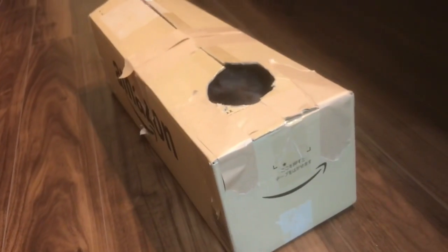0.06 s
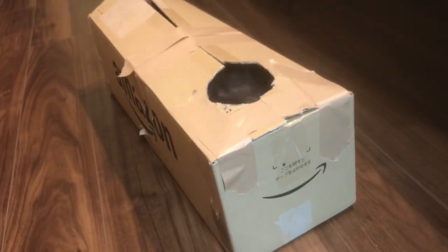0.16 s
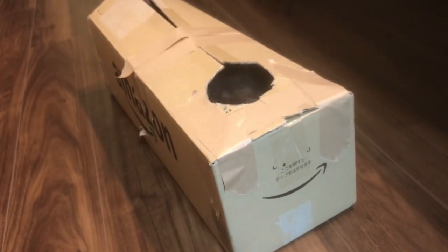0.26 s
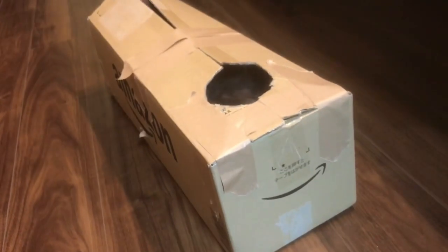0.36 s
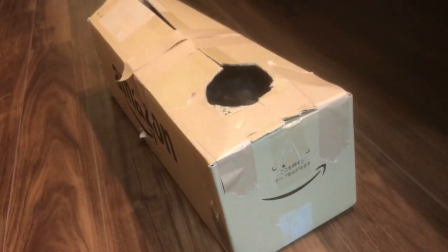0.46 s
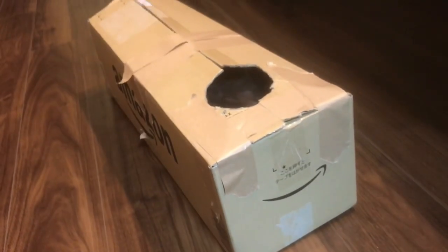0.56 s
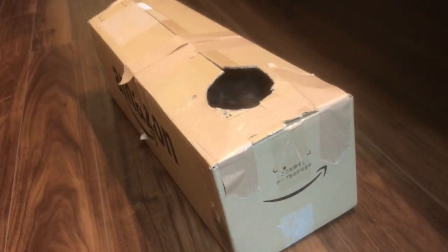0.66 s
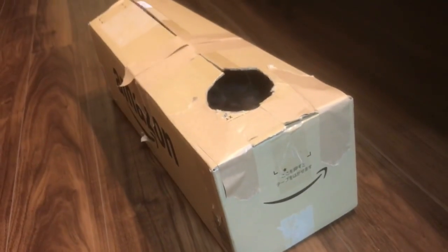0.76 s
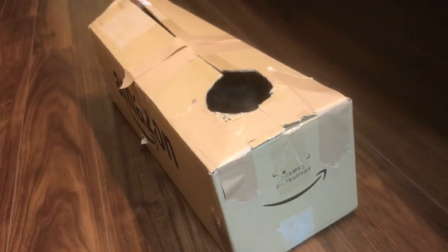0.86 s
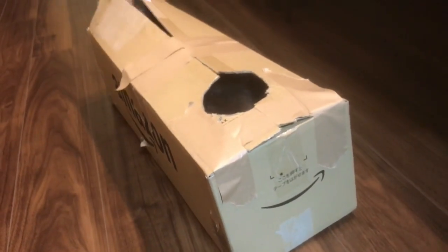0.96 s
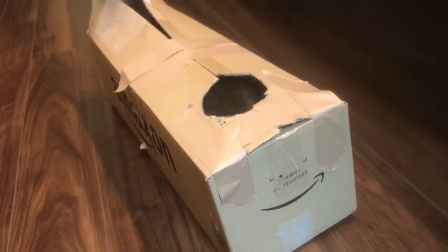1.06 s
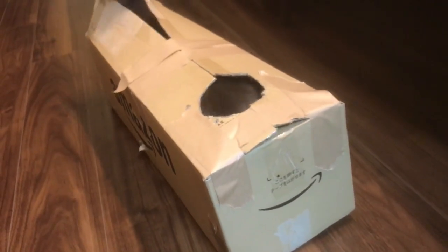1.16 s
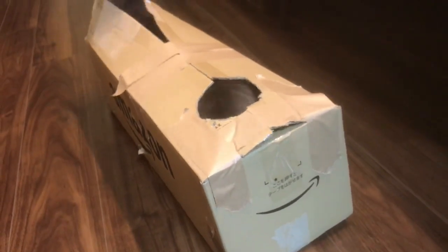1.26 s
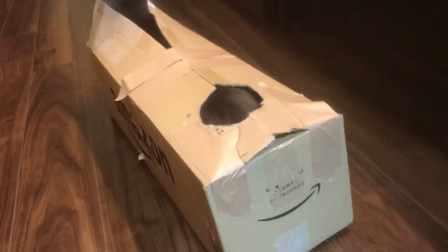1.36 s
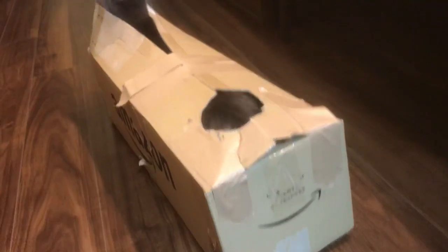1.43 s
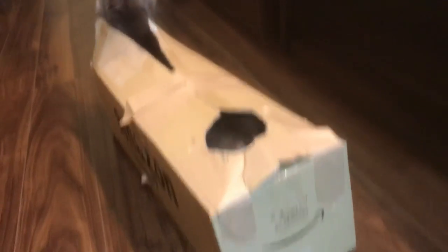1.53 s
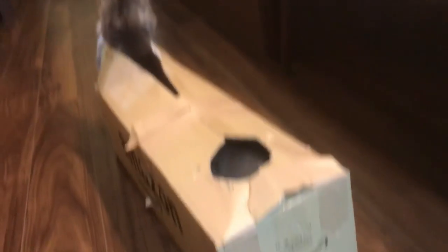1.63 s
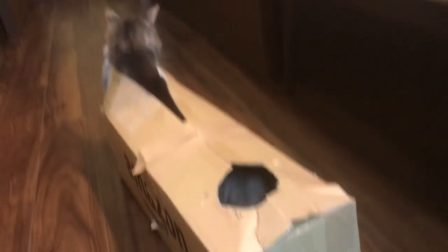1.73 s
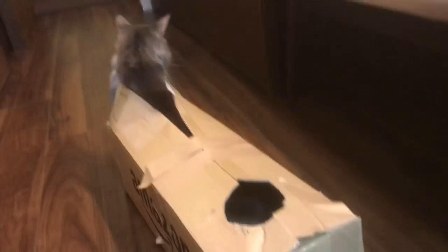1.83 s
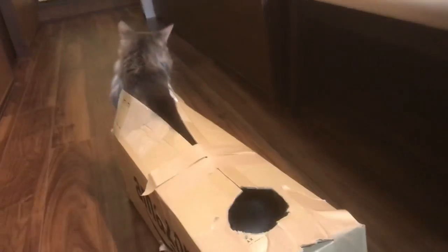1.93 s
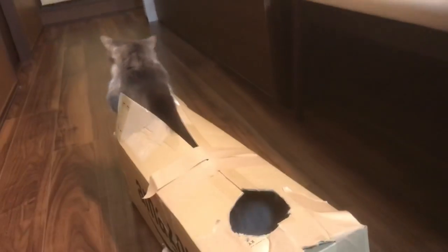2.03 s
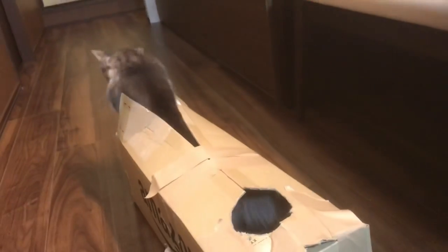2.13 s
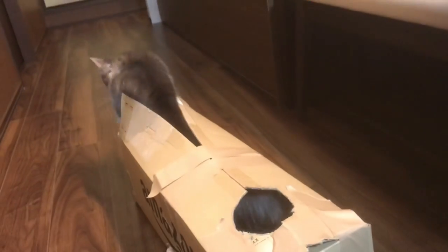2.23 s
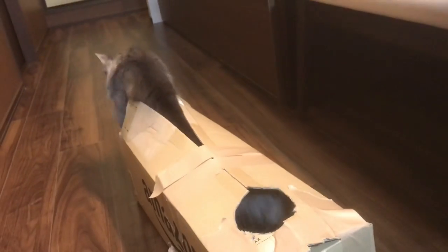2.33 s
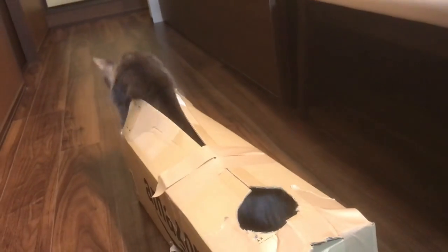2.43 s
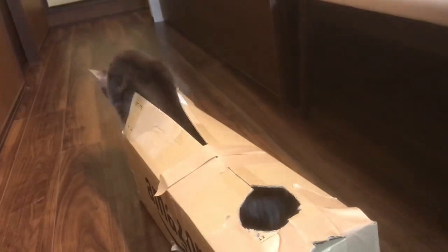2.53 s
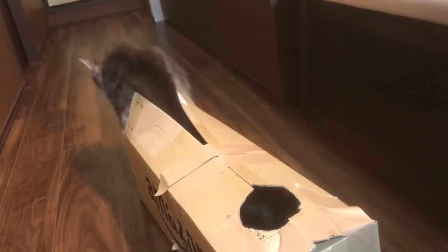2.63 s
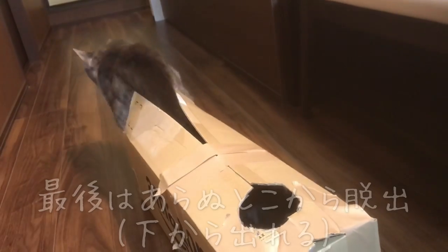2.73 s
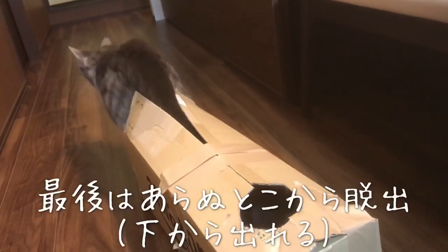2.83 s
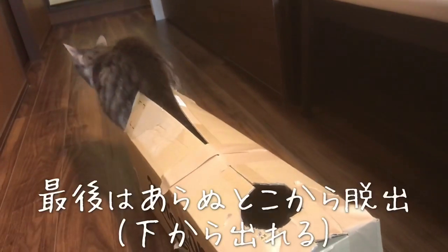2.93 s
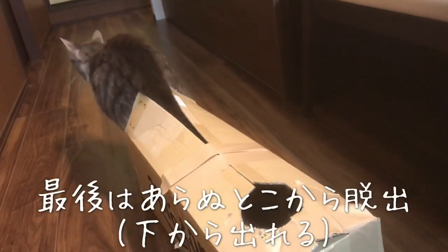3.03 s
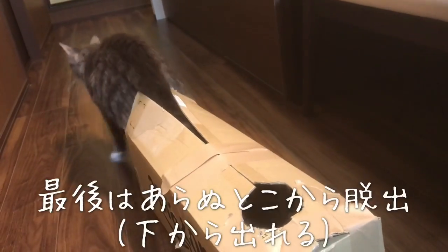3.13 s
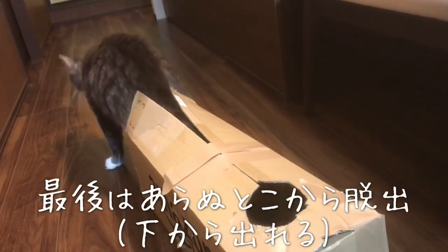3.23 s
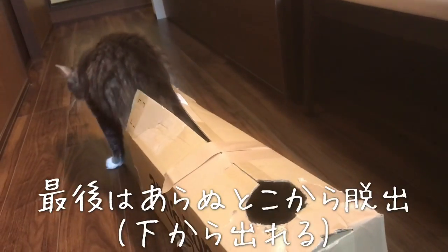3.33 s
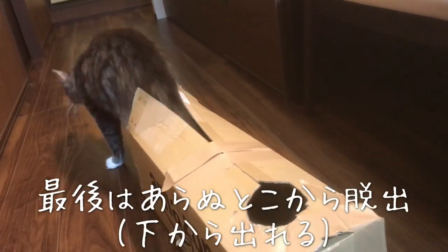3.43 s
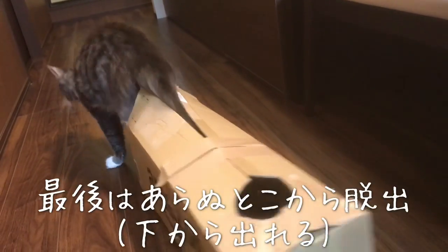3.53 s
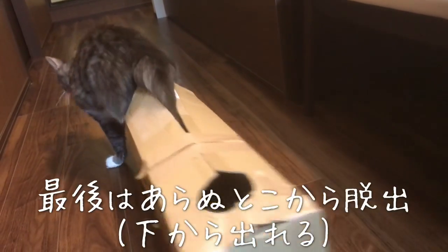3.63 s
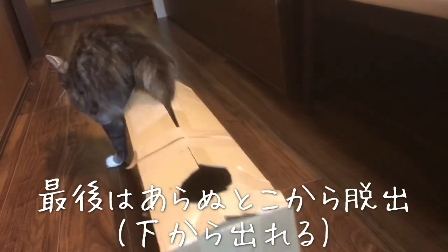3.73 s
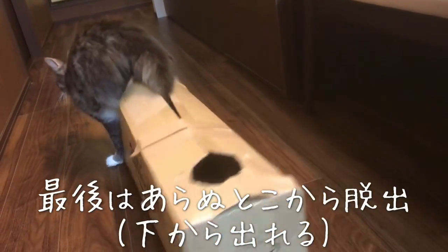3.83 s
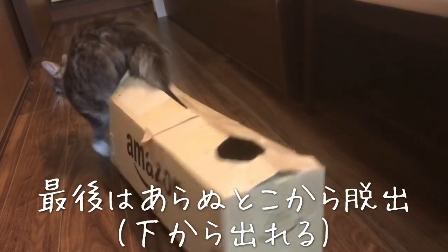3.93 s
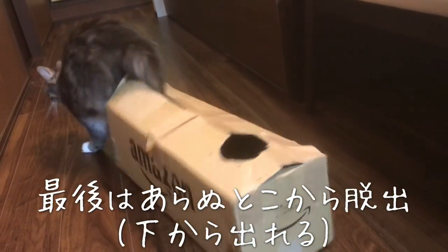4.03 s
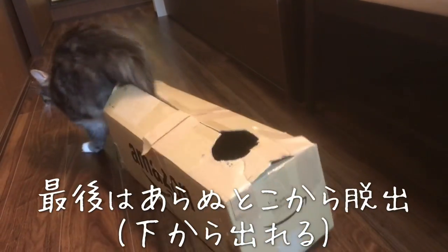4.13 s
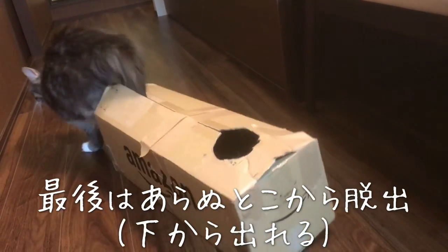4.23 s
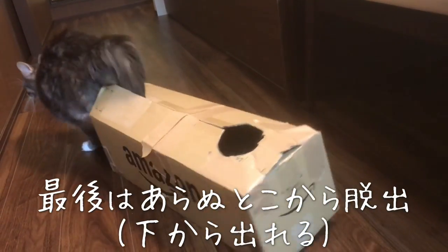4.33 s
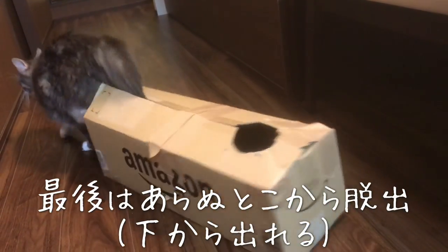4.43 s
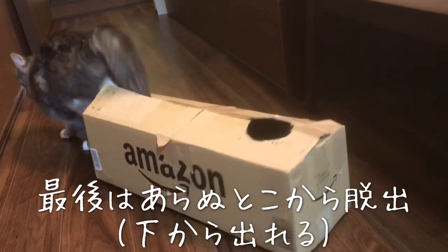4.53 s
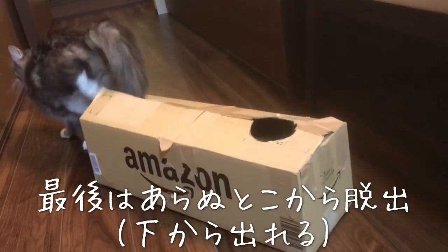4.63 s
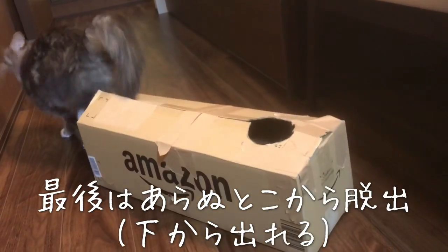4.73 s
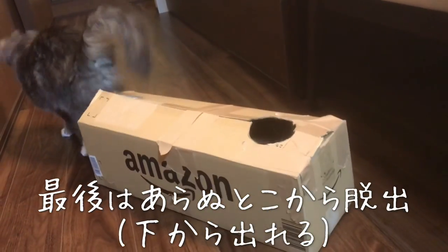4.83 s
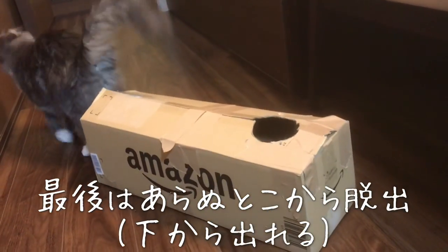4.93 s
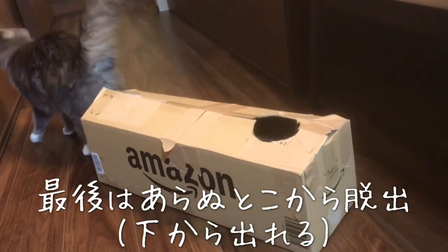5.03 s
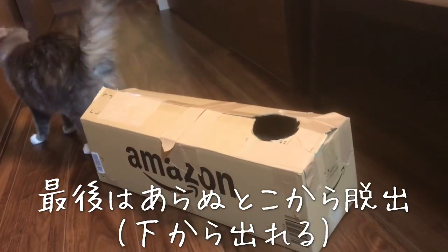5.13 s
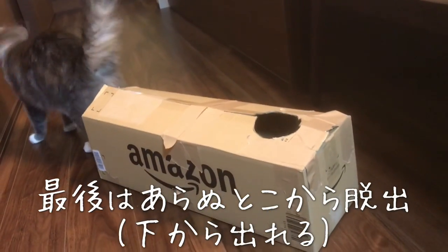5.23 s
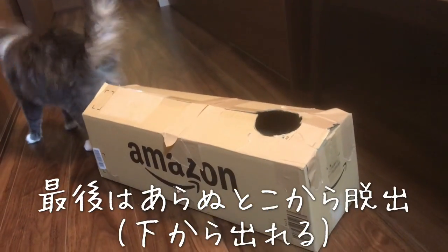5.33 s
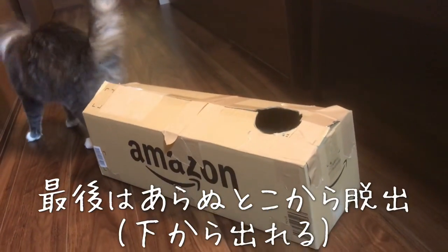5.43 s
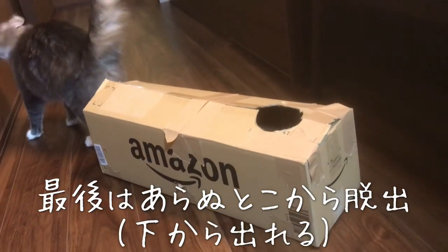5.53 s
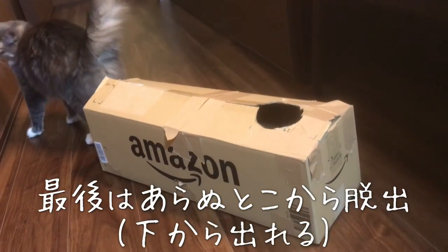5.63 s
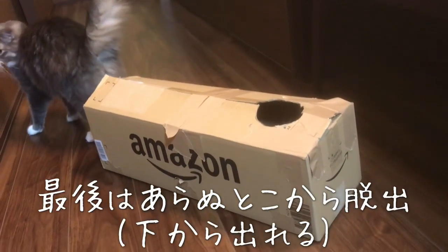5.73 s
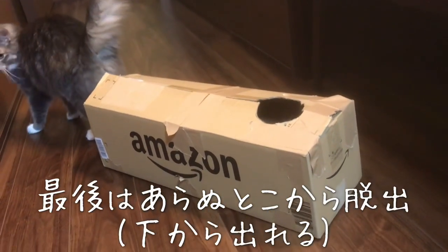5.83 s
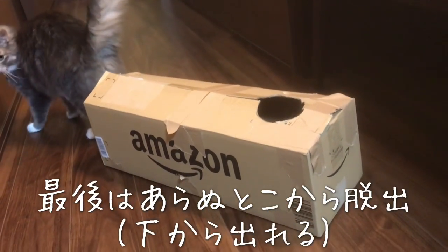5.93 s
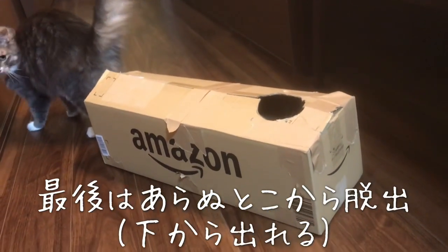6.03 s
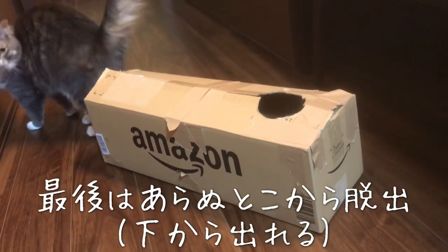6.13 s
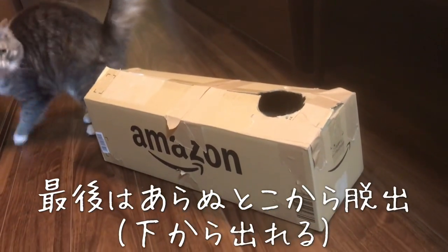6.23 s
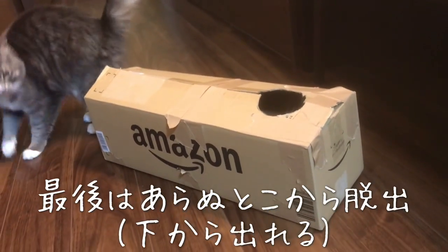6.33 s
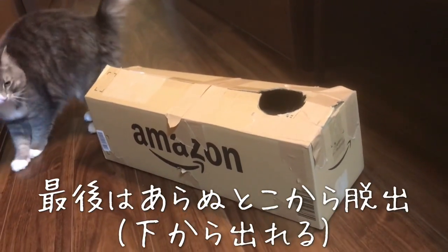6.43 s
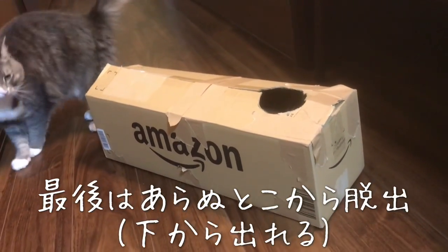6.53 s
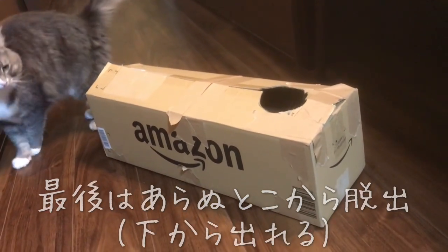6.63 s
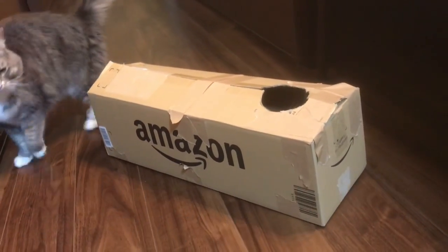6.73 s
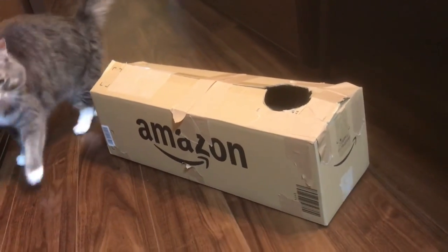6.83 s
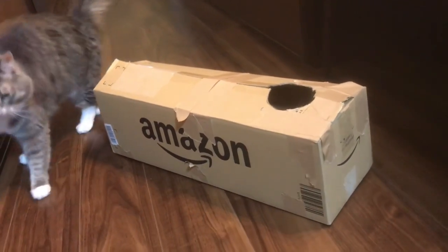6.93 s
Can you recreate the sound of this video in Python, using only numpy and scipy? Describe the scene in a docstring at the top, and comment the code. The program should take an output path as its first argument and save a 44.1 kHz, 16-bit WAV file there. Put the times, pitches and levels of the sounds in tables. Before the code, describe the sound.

A cat squeezes out of a cardboard box, scraping and rustling, with hollow thumps, claw ticks and one heavy thud on a wooden floor.

```python
"""A cat squeezes out of a long cardboard box on a wooden floor in a quiet home.
Over faint room noise, friction slips on fur and walls drive the box modes from the start;
weight thumps the floor panels as damped modes, and claws and creases tick as noise snaps through resonances.
Near 4 s an edge squeaks by stick-slip, then the heaviest thump lands; blows and rubbing thin out,
and from 6 s paw pads brush the boards as soft puffs of filtered noise."""
import sys
import numpy as np
from scipy import signal
from scipy.fft import rfft, irfft, next_fast_len
from scipy.io import wavfile

SR = 44100
rng = np.random.default_rng(int(sys.argv[2]) if len(sys.argv) > 2 else 0)


def materialize(psi):
    """Save the field psi as 16-bit PCM at rate SR to the path in sys.argv[1].

    A 1-D psi becomes a single channel; in a 2-D psi each row is a channel.
    """
    bounded = np.clip(np.atleast_2d(psi).T, -1, 1)
    quanta = np.round(bounded * 32767).astype(np.int16)
    wavfile.write(sys.argv[1], SR, quanta)


N = 307818

# steady room air, relative spectrum: freq_hz, density_db (per Hz)
AIR_SPECTRUM = [(15, -61), (25, -38), (41, -3.5), (64, -1.5), (120, -10.5), (170, -6), (276, -19),
                (425, -22), (486, -23.5), (587, -22.5), (1980, -35), (4950, -42), (13100, -34),
                (15800, -36)]
AIR_DB = -63.5
# noise bands in the room: centre_hz, width_hz (of each of two passes), level_db (rms)
HUM_BANDS = [(61.1, 4.9, -74.5), (81, 1.6, -68.5), (157, 2.6, -80.5), (341.3, 13, -84), (13100, 650, -80)]
# modes of the box: freq_hz, level_db (relative), t60_s
BOX_MODES = [(52, 2.5, 1), (80.9, 4.5, 0.92), (109.7, 1.5, 0.26), (128.4, 2.5, 0.27), (150.7, -2.5, 0.53),
             (189.4, 0.5, 0.079), (257.4, -1, 0.2), (308.4, 2, 0.42), (420, -17, 0.41), (508, -9.5, 0.15),
             (631.7, -2.5, 0.22), (733, -13.5, 0.016), (835, -12.5, 0.058), (912, -10.5, 0.044),
             (1032, -21, 0.053), (1330, 0.5, 0.016), (1458, -2, 0.034), (1560, -2.5, 0.038),
             (1703, -16, 0.062), (2300, -33, 0.04), (2780, -42, 0.075), (3250, -33, 0.048),
             (3780, -16, 0.052)]
LOW_MODES, WALL_MODES = BOX_MODES[:9], BOX_MODES[9:]      # they part at about 450 Hz
# relative spectra of scrape, fur and its finer sheen: freq_hz, density_db (per Hz)
SCRAPE_SPECTRUM = [(210, -18.5), (350, -8), (419, -6.5), (852, 3), (1200, -1.5), (1370, -8.5), (1850, -6),
                   (3000, -5.5), (3900, -49), (6600, -120)]
FUR_SPECTRUM = [(1500, -2), (2500, -4), (3500, -2), (4700, -3.5), (5300, -5), (7000, -8), (9000, -21.5)]
SHEEN_SPECTRUM = [(5000, -53), (7000, -9.5), (9000, -0.5), (12000, 0), (14000, -1), (16000, -1.5)]
# the body leaning along the walls: time_s, scrape_db, fur_over_scrape_db, sheen_over_fur_db
LEANING = [(0.0, -58, -0.5, -0.5), (.13, -58.5, -4, 7.5), (.33, -58, -4.5, -2.5), (.53, -71.5, 3.5, -3.5),
           (.86, -69, -0.5, 0), (.95, -60, -1.5, 0), (1.4, -54.5, -4, -1), (1.84, -51.5, -6, -1),
           (1.915, -72, -3, -1), (1.95, -59, -0.5, -3), (2.43, -63, -4, 0), (2.56, -52, -1.5, -1.5),
           (2.66, -54, -1, 0.5), (2.87, -56.5, -2, -0.5), (3.26, -58, -5.5, -1), (3.57, -51.5, -3, -1.5),
           (3.67, -52, 4.5, 2), (3.75, -52.5, 4.5, 6), (3.97, -51.5, 5.5, -1.5), (4.2, -53, 7.5, 1),
           (4.26, -49, -12, 0.5), (4.42, -55.5, -8, -5), (4.7, -58.5, -11, -3), (4.82, -55, -7.5, 0.5),
           (4.92, -79, 4.5, -4), (5.2, -69, -1.5, -6), (5.62, -68.5, -4, -4), (5.7, -80, 4, -13.5),
           (6.98, -82.5, 5.5, -2.5)]
# single strokes of paw or flank on the board:
# peak_s, length_s, scrape_db, fur_over_scrape_db, rocking_over_scrape_db
BOARD_STROKES = [(0.235, 0.11, -46.5, -7.5, 10), (0.588, 0.08, -47, -10, 5.5),
                 (0.642, 0.19, -47.5, -0.5, -0.5), (1.078, 0.21, -54.5, -0.5, 9),
                 (1.16, 0.36, -50, -6.5, -8), (1.248, 0.22, -47.5, -4, 7), (1.447, 0.45, -62, 5, -8),
                 (1.713, 0.092, -43, -9, -12), (1.952, 0.048, -51, 3.5, 2), (2.062, 0.09, -60, 8.5, 5.5),
                 (2.152, 0.24, -52.5, 0.5, -5), (2.238, 0.11, -52, -0.5, -4), (2.352, 0.11, -53, -4, 5),
                 (3.038, 0.16, -57.5, -1, 3), (3.208, 0.11, -59.5, -21, 8), (3.3, 0.1, -55.5, 0.5, -14),
                 (3.467, 0.2, -52, -7, -19), (3.624, 0.097, -50, -6, -1.5), (3.716, 0.071, -50, 5.5, -6),
                 (3.783, 0.14, -56, 10, 1), (4.08, 0.085, -62, 10, -1), (4.14, 0.11, -44.5, -20, 4),
                 (4.226, .1, -38.5, -23, 5.5), (4.323, 0.19, -48, -1.5, -17), (4.476, 0.23, -49.5, -4, -26),
                 (4.532, 0.17, -55.5, 9.5, -14), (4.592, 0.19, -60, 6, 10), (4.642, 0.14, -48, -2.5, 4.5),
                 (4.682, 0.1, -61, -15, 13), (4.738, 0.13, -49.5, -3.5, -6), (5.022, 0.073, -65, -3, 2),
                 (5.207, 0.16, -69, 3, 9.5), (5.285, 0.15, -60.5, -22, 4), (5.371, 0.043, -70, 8, 17.5),
                 (5.406, .06, -60.5, -19, 9), (5.474, 0.092, -73.5, 14, 21.5), (5.517, 0.24, -62.5, -10, 8),
                 (5.79, 0.22, -80, 9.5, 6)]
STROKE_RISE, STROKE_EDGE_DB, STROKE_ROUND = 0.34, -17, 1.3     # share before the peak; level at ends; roundness
LEAN_ROCK_DB, REST_ROCK_DB = -6.5, -70.5      # rocking over the leaning scrape; rocking at rest
RATTLE_DB, RATTLE_T60_S = -24, 0.52         # the box rocks on after each thump
# weight landing on the floor: start_s, peak_db, panel_hz (pitch of the loaded panel), panel_t60_s, hardness_db
WEIGHT_THUMPS = [(.167, -43, 271, .13, -11), (0.217, -25, 328.4, 0.15, -5.5), (.235, -26, 130, 0.1, -20),
                 (.545, -48, 318, .15, -22), (0.668, -41, 130, 0.11, -25), (.839, -34.5, 140.5, 0.21, -32),
                 (1.022, -39.5, 155, 0.057, -20), (1.077, -47, 84.4, 0.16, -14),
                 (1.107, -37.5, 303, 0.13, -11), (1.161, -39.5, 80.7, 0.19, -18),
                 (1.194, -41.5, 293, .1, -13), (1.222, -33.5, 118, 0.075, -22),
                 (1.261, -30.5, 127, 0.08, -2), (1.705, -36.5, 328, 0.086, -4), (1.72, -34, 81, 0.16, -25),
                 (1.944, -32, 116, 0.19, -29), (1.999, -40.5, 91.5, 0.34, -25),
                 (2.24, -40.5, 101, .19, -15), (2.365, -35, 147.4, 0.24, -10), (2.516, -36.5, 348, .1, -9),
                 (3.248, -43, 109, 0.068, -21.5), (3.329, -46, 89, 0.31, -6), (3.506, -43, 138, 0.25, -17),
                 (3.625, -29, 108, 0.15, -30), (3.785, -23.5, 233, .07, -22), (3.79, -29, 118, .2, -24.5),
                 (3.985, -32, 323, 0.054, -3), (4.11, -26, 136.5, 0.3, -29), (4.146, -26, 161, .094, -7),
                 (4.19, -28, 178, 0.37, -10), (4.208, -19, 142, .082, 1), (4.22, -11.5, 127, 0.1, -4.5),
                 (4.288, -31, 125, 0.4, -23), (4.328, -36.5, 111, 0.13, -15), (4.566, -40, 100, 0.2, -21),
                 (4.842, -44, 88.8, 0.14, -19), (5.016, -36, 61, 0.54, -29), (5.129, -42.5, 57, .13, -39),
                 (5.208, -42.5, 93.5, 0.2, -21), (5.313, -39.5, 122, 0.12, -7),
                 (5.417, -39.5, 95, 0.17, -11), (5.52, -42, 131, .088, -13), (5.581, -42, 143, 0.14, -11),
                 (5.627, -37.5, 91, 0.075, -11)]
LANDING_CYCLES = 0.45     # time constant of a landing, in swings of the panel
# claws and creases: start_s, peak_db, centre_hz, t60_s, crack_db (share of bright crack)
CLAW_TICKS = [(0.17, -34.5, 1450, 0.12, -22), (0.2154, -26.5, 912, 0.057, -11),
              (0.399, -24, 4680, 0.04, -15), (.574, -36.5, 1510, 0.15, -20), (.625, -31, 1420, 0.2, -28),
              (1.4164, -34.5, 3540, .02, 10), (1.509, -23, 3250, 0.031, 14.5), (1.527, -32, 1200, 0.031, 6),
              (1.6267, -31, 1530, 0.042, -16), (1.815, -33.5, 3700, 0.079, -18),
              (1.936, -26.5, 1530, 0.02, 4), (1.948, -29, 770, 0.026, -26), (2.061, -36, 3930, 0.055, -10),
              (2.598, -37, 912, 0.05, -20), (2.651, -36.5, 880, 0.05, -24), (3.284, -36, 866, 0.12, -15),
              (3.501, -35.5, 1500, 0.059, -17), (3.632, -29, 3260, 0.056, -24),
              (4.206, -20, 912, 0.074, -3), (4.224, -14.5, 1400, 0.089, -28), (4.48, -38, 1500, .08, -26),
              (5.221, -47, 1670, 0.038, -16), (5.274, -45, 1610, .04, -17), (5.323, -51, 1680, .035, -18),
              (5.372, -50, 710, .035, -18), (5.401, -44.5, 1470, .038, -20), (5.479, -43, 1710, 0.056, -11),
              (5.506, -41, 1450, 0.079, -24), (5.61, -44, 1280, .038, -24),
              (6.6252, -45.5, 596, 0.061, -24)]
# a box edge drags on the boards: time_s, level_db, pitch_hz
EDGE_SQUEAK = [(3.959, -60, 2057), (3.989, -55, 2210), (4.04, -47, 2643), (4.07, -54, 2600),
               (4.1, -58, 2250), (4.129, -55, 2080), (4.18, -47, 2160), (4.2, -64, 2200)]
# paw pads brush the boards: start_s, peak_db, centre_hz, length_s
PAW_BRUSHES = [(6.03, -61.5, 4400, 0.04), (6.294, -58.5, 4600, 0.029), (6.449, -48.5, 6500, 0.026),
               (6.565, -61.5, 6470, 0.027), (6.849, -59.5, 5130, 0.041), (6.927, -54.5, 5960, 0.034)]
ROOM_T60_S, ROOM_DB = 0.46, -15.5
# colour of the microphone port: centre_hz, width_hz, gain_db
MIC_PORT = [(4940, 190, -6.5), (7550, 600, -3.5), (10550, 580, -5)]
MIC_LOW_HZ, CUTOFF_HZ = 50.7, 15720


def from_db(db):
    """Level law: decibels to amplitude gain."""
    return 10 ** (np.asarray(db) / 20)


def rms_one(x):
    """Normalisation: scales a signal to rms 1."""
    return x / np.sqrt(np.mean(x ** 2) + 1e-20)


def add(out, start_s, sound):
    """Superposition: mixes a sound in at its start time."""
    at = round(start_s * SR)
    out[at:at + len(sound)] += sound[:N - at]


def colour(x, spectrum):
    """Linear filtering: spectrum points joined over log frequency weight the signal; rms 1."""
    size = next_fast_len(N)
    hz, db = np.transpose(spectrum)
    log_bins = np.log(np.fft.rfftfreq(size, 1 / SR) + 1)
    gain = from_db(np.interp(log_bins, np.log(hz), db, -90, -90))
    return rms_one(irfft(rfft(x, size) * gain, size)[:N])


def resonance(x, hz, width_hz):
    """Damped resonance: a two-pole band-pass with gain 1 on top."""
    r = np.exp(-np.pi * width_hz / SR)
    poles = [1, -2 * r * np.cos(2 * np.pi * hz / SR), r * r]
    return signal.lfilter([(1 - r * r) / 2, 0, (r * r - 1) / 2], poles, x)


def flutter(rate_hz, depth_db):
    """Random modulation: low-passed noise moves the gain by depth_db rms."""
    r = np.exp(-2 * np.pi * rate_hz / SR)
    slow = signal.lfilter([1], [1, -2 * r, r * r], rng.standard_normal(N + SR))[SR:]   # settled after 1 s
    return from_db(depth_db * rms_one(slow))


def grains(per_s, spread_db):
    """Dry friction: random slips of uneven size and sign."""
    sizes = from_db(spread_db * np.minimum(rng.exponential(1, N), 4))
    signs = rng.choice([-1, 1], N)
    return sizes * signs * (rng.random(N) < per_s / SR)


def background():
    """Steady noise: broad room air, with narrow resonances as wavering hums and a thin high hiss."""
    noise = rng.standard_normal(N)
    hums = np.zeros(N)
    for hz, width_hz, db in HUM_BANDS:
        band = resonance(resonance(noise, hz, width_hz), hz, width_hz)
        hums += from_db(db) * rms_one(band)
    return from_db(AIR_DB) * colour(rng.standard_normal(N), AIR_SPECTRUM) + hums


def efforts():
    """Power addition: leaning, strokes and rattle after thumps give the gains of rocking, scrape, fur and sheen."""
    t = np.arange(N) / SR
    time_s, *columns = np.transpose(LEANING)
    lean_db, furry_db, fine_db = [np.interp(t, time_s, c) for c in columns]
    power = from_db(np.array([lean_db + LEAN_ROCK_DB, lean_db, lean_db + furry_db])) ** 2
    power[0] += from_db(REST_ROCK_DB) ** 2
    for peak, length, db, fur_db, rock_db in BOARD_STROKES:
        near = slice(max(int((peak - 2 * length) * SR), 0), int((peak + 2 * length) * SR))
        before = (peak - t[near]) / STROKE_RISE
        after = (t[near] - peak) / (1 - STROKE_RISE)
        away = np.maximum(before, after) / length      # 0 at the peak, 1 at both ends
        levels_db = db + np.array([[rock_db], [0], [fur_db]])
        power[:, near] += from_db(levels_db + STROKE_EDGE_DB * away ** STROKE_ROUND) ** 2
    for start_s, db, *rest in WEIGHT_THUMPS:
        rattle_db = db + RATTLE_DB - 60 * t[:SR // 2] / RATTLE_T60_S
        add(power[0], start_s, from_db(rattle_db) ** 2)
    rock, scrape, fur = np.sqrt(power)
    return rock, scrape, fur, fur * from_db(fine_db)


def patches(x, low_hz, high_hz, count, width, depth_db):
    """Moving contact: narrow resonances across a range come and go independently."""
    centres = np.geomspace(low_hz, high_hz, count)
    return rms_one(sum(flutter(13.0, depth_db) * resonance(x, hz, width * hz) for hz in centres))


def rubbing():
    """Friction excitation: slips drive the box modes; fur adds a hiss and a finer sheen."""
    rocking, scraping, furring, sheening = efforts()
    shoves = grains(400., 0.54) * flutter(8.9, 2.6)
    slips = grains(3000., 1.4) * flutter(32.0, 1.03)
    hairs = grains(10000., 2.1) * flutter(19.0, 0.72)
    low, walls = np.zeros(N), np.zeros(N)
    decay = np.log(1000) / np.pi      # bandwidth in Hz times t60 in s
    for hz, db, t60 in LOW_MODES:
        low += from_db(db) * resonance(shoves, hz, 2.06 * decay / t60)      # damped by the load
    for hz, db, t60 in WALL_MODES:
        # each wall mode is fed more or less as the contact moves along the board
        walls += from_db(db) * resonance(slips * flutter(8.3, 4.3), hz, decay / t60)
    scrape = rms_one(colour(slips, SCRAPE_SPECTRUM) + .8 * rms_one(walls))
    rasp = rms_one(hairs) + 0.2 * patches(hairs, 2010.0, 14100.0, count=16, width=0.057, depth_db=10.0)
    fur = furring * colour(rasp, FUR_SPECTRUM) + sheening * colour(rasp, SHEEN_SPECTRUM)
    return rocking * rms_one(low) + scraping * scrape + fur


def thumps(near_db=2.0, focus_db=11.5):
    """Modal impact: a blow rings the loaded panel, box modes near its pitch and, if hard, higher modes."""
    out, t = np.zeros(N), np.arange(SR // 3)[:, None] / SR
    hz, mode_db, t60 = np.transpose(BOX_MODES)
    chance = rng.normal(0, 3.05, (len(WEIGHT_THUMPS), len(BOX_MODES)))      # dB
    for (start_s, db, panel_hz, panel_t60, hard_db), luck in zip(WEIGHT_THUMPS, chance):
        near = near_db - focus_db * np.abs(np.log2(hz / panel_hz))      # falls per octave away
        drive_db = np.where(hz > 450, np.maximum(near, hard_db), near)
        gains = from_db(mode_db + luck + drive_db)
        panel = from_db(-60 * t / panel_t60) * np.sin(2 * np.pi * panel_hz * t)
        others = from_db(-60 * t / np.minimum(t60, panel_t60)) * np.sin(2 * np.pi * hz * t)
        swell = 1 - np.exp(-t[:, 0] * panel_hz / LANDING_CYCLES)      # a soft paw takes a moment to land
        low = panel[:, 0] + others @ (gains * (hz < 450))
        high = others @ (gains * (hz > 450))
        blow = swell * low + np.sqrt(swell) * high
        add(out, start_s, from_db(db) * blow / np.abs(blow).max())
    return out


def ticks(tail=0.62, width=0.19):
    """Impulse excitation: a snap rings wall modes and a centre pitch, with a dying rustle and a bright crack."""
    out, t = np.zeros(N), np.arange(SR // 6) / SR
    draws = rng.standard_normal((len(CLAW_TICKS), SR // 6))
    for (start_s, db, centre_hz, t60, crack_db), noise in zip(CLAW_TICKS, draws):
        snap = noise * np.exp(-t / 0.0011) + (t == 0)
        rustle = noise * from_db(-60 * t / t60)
        # higher modes die sooner
        walls = sum(rms_one(resonance(snap, hz, 1.8 / t60 * hz / 1000)) for hz, *rest in WALL_MODES)
        near = resonance(snap + tail * rustle, centre_hz, width * centre_hz)
        crack = resonance(snap + tail * rustle, 5300.0, 11000.)
        burst = rms_one(walls) * (centre_hz < 4500)      # the highest ticks ring no walls
        burst = burst + 2.5 * rms_one(near) + from_db(crack_db) * rms_one(crack)
        add(out, start_s, from_db(db) * burst / np.abs(burst).max())
    return out


def squeak(wobble_db=0.5):
    """Fast stick-slip: uneven slips blur and waver a gliding tone."""
    time_s, db, hz = np.transpose(EDGE_SQUEAK)
    t = np.arange(N) / SR
    pitch = np.interp(t, time_s, hz) * flutter(256.0, wobble_db)
    phase = 2 * np.pi * np.cumsum(pitch) / SR
    level = from_db(np.interp(t, time_s, db, -120, -120))
    return level * flutter(60., 6.0) * np.sin(phase)


def brushes(width=0.56):
    """Friction noise: band-passed hiss swells and fades in soft puffs."""
    out, t = np.zeros(N), np.arange(SR // 8) / SR
    draws = rng.standard_normal((len(PAW_BRUSHES), SR // 8))
    for (start_s, db, centre_hz, length), noise in zip(PAW_BRUSHES, draws):
        puff = resonance(noise, centre_hz, width * centre_hz) * t * np.exp(-3 * t / length)
        add(out, start_s, from_db(db) * puff / np.abs(puff).max())
    return out


def room(x):
    """Reverberation: convolution with a short dull tail of dense reflections."""
    t = np.arange(SR // 2) / SR
    dull = signal.lfilter([.4], [1, -.6], rng.standard_normal(len(t)))
    tail = dull * from_db(-60 * t / ROOM_T60_S) * (t > .004)
    return signal.fftconvolve(x, tail / np.sqrt(np.sum(tail ** 2)))[:N]


def scene():
    """Superposition: blows with their room tail, rubbing and squeak over the background."""
    blows = thumps() + ticks() + brushes()
    return (background() + rubbing() + blows + from_db(ROOM_DB) * room(blows) + squeak())[None]


def record(dry):
    """Transducer response: a small microphone loses deep bass, its port dips the treble; the top is cut."""
    dry = signal.sosfilt(signal.butter(2, MIC_LOW_HZ, "high", fs=SR, output="sos"), dry)
    for hz, width_hz, db in MIC_PORT:
        dry = dry + (from_db(db) - 1) * resonance(dry, hz, width_hz)
    return signal.sosfilt(signal.ellip(12, .5, 70, CUTOFF_HZ, fs=SR, output="sos"), dry)


dry = scene()
out = record(dry)
materialize(out)
```